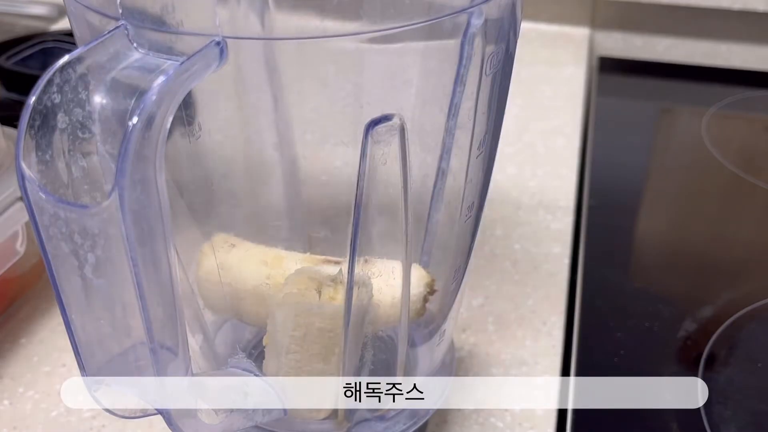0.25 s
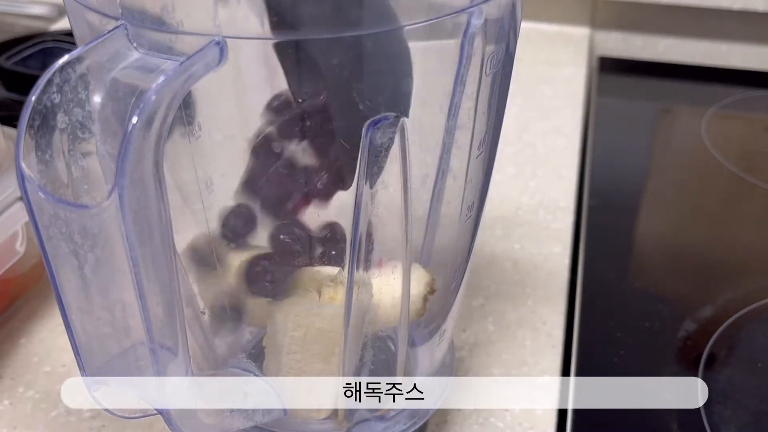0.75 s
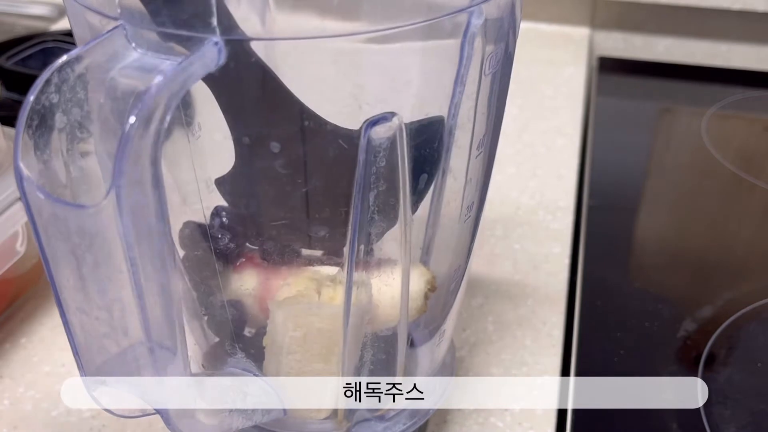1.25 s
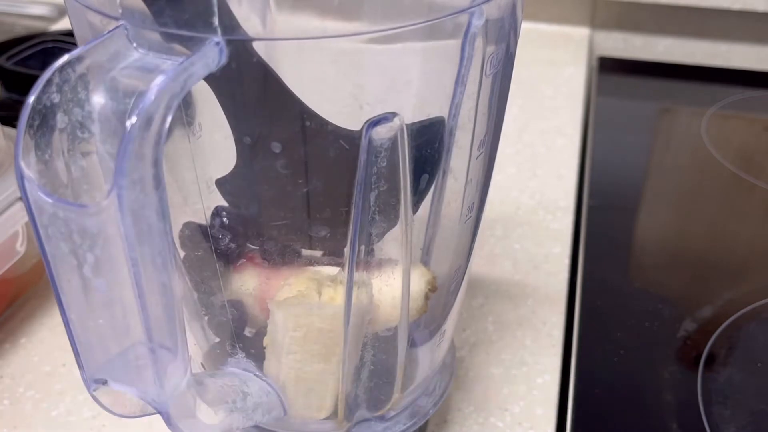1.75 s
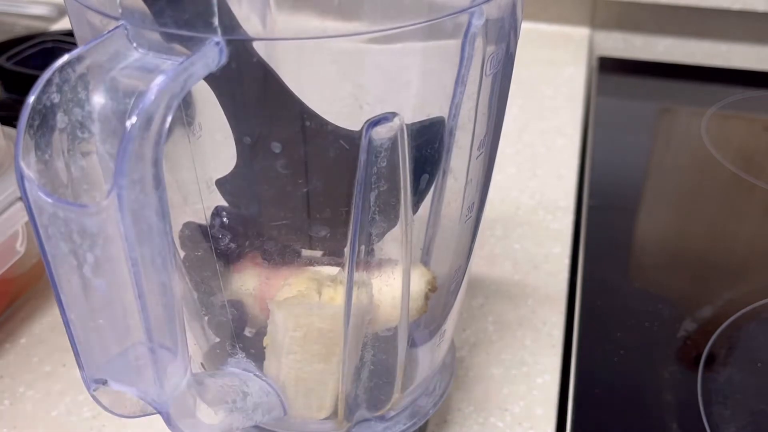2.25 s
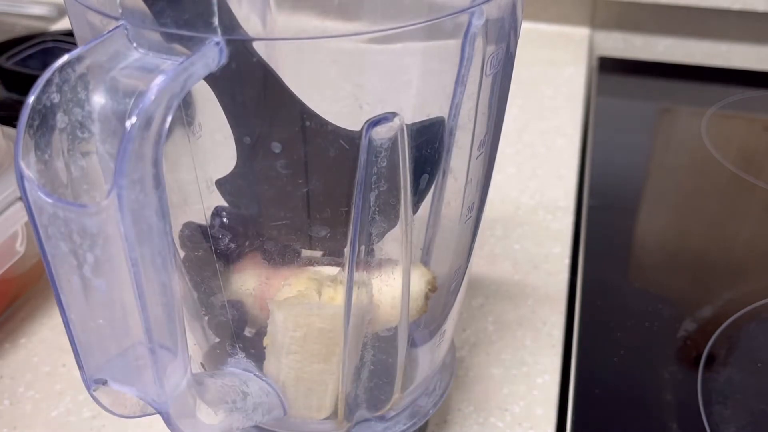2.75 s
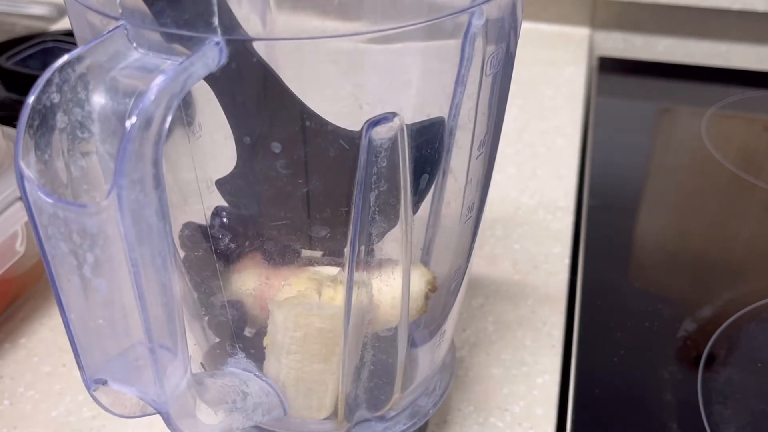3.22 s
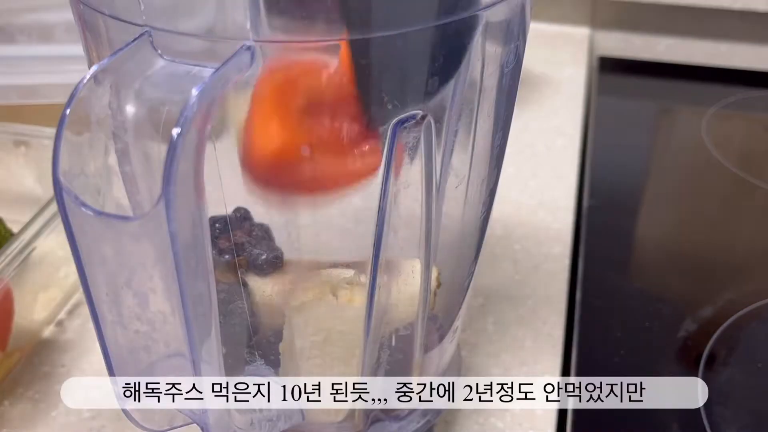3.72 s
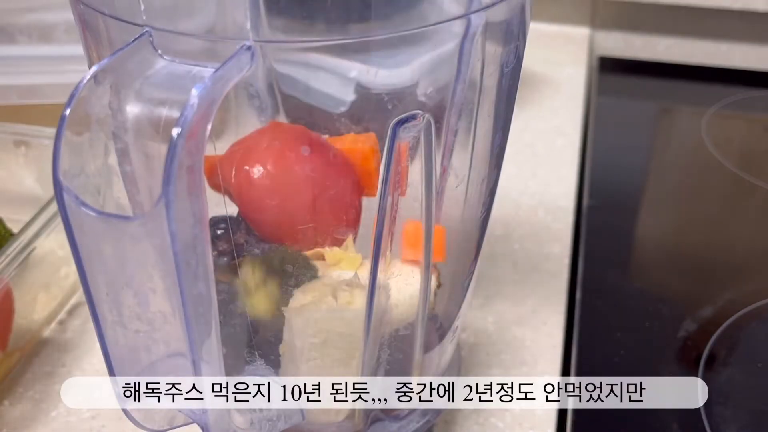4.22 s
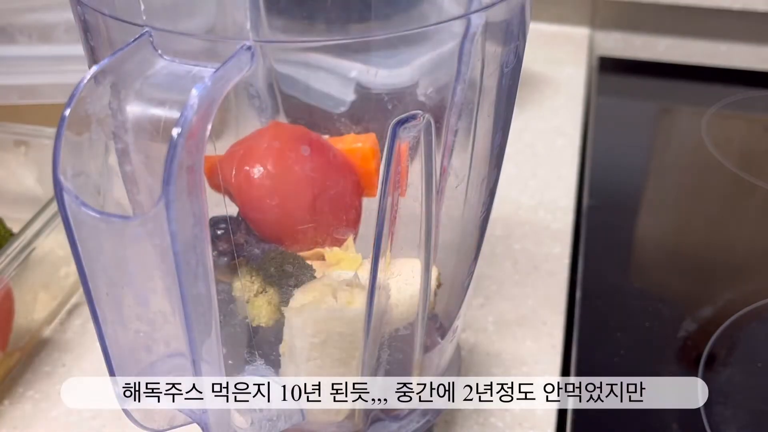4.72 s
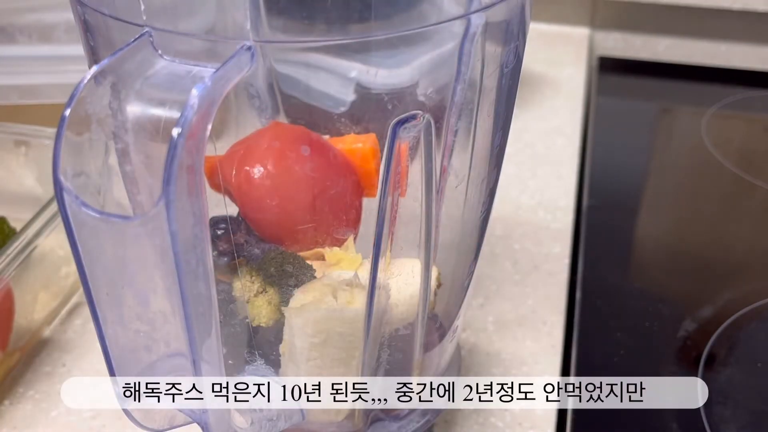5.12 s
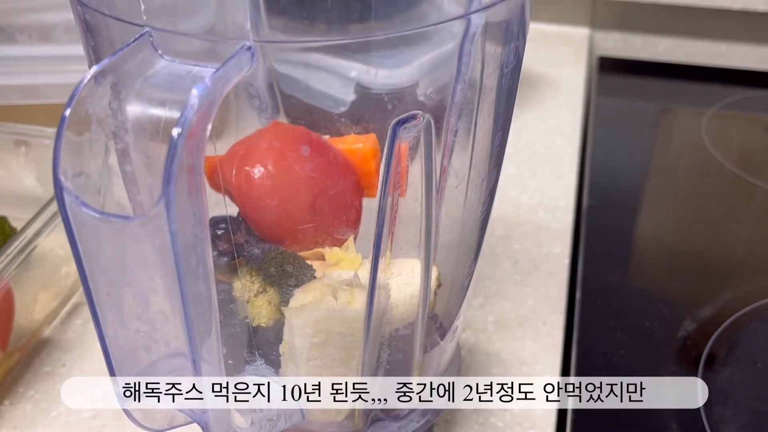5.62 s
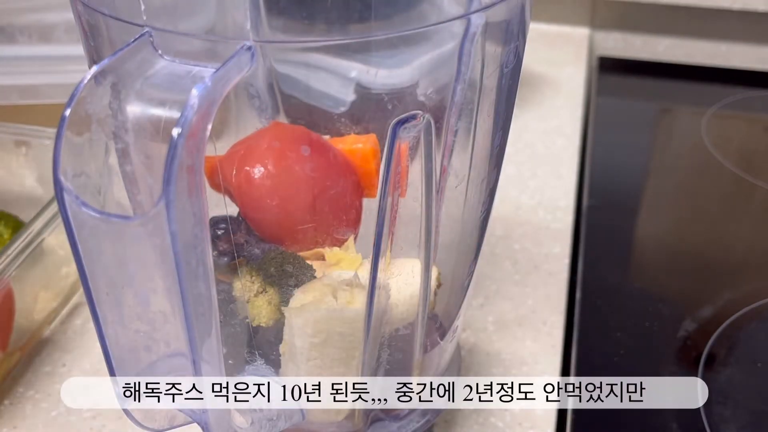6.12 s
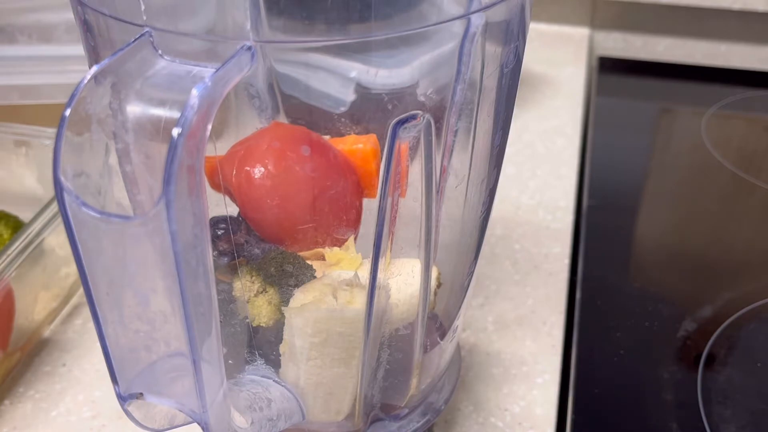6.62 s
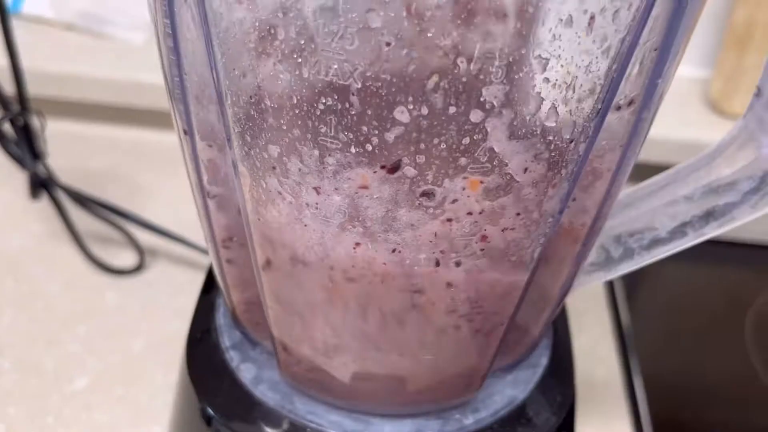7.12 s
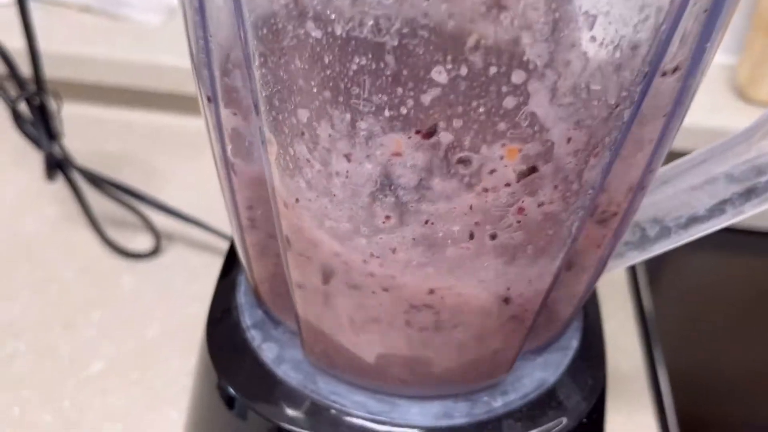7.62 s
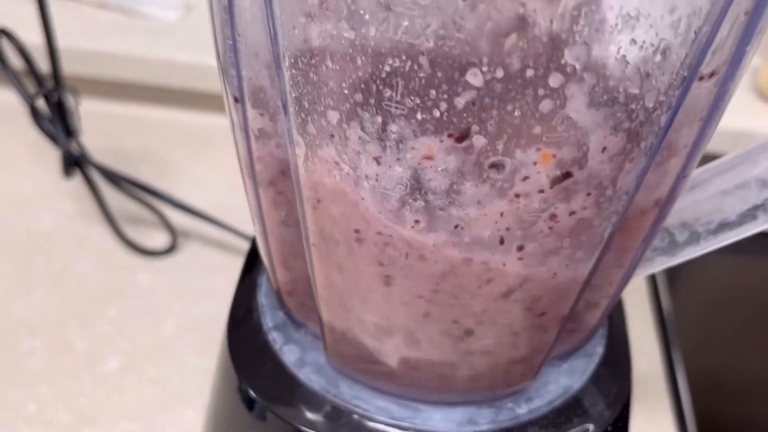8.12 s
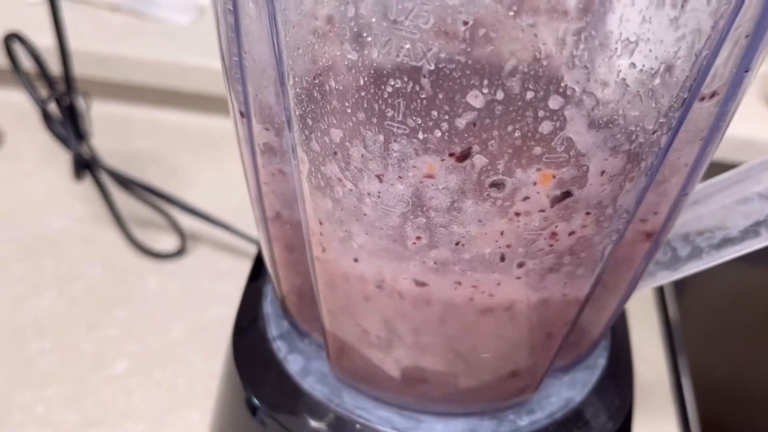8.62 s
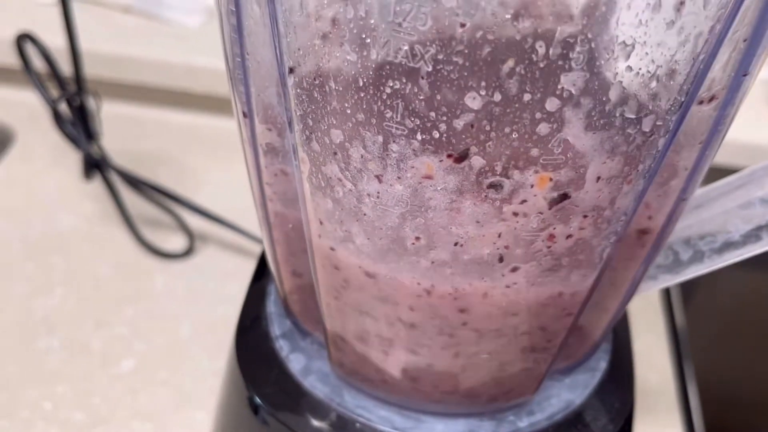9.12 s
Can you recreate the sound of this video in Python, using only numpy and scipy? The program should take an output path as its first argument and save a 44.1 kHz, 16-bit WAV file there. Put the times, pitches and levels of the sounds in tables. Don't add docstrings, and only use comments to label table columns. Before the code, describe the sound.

Phone-close stereo kitchen scene: quiet room air and hum, a burst of hard berry rattles ringing the jug wall, hollow container knocks, one loud lid snap and smaller thuds. A calmer stretch follows with faint bag crinkle and a few distant taps. Then, without any start-up, a loud blender roars steadily, with wet slosh, shaft whine, bubbling gulps and a brief squeak.

```python
import sys
import numpy as np
from scipy import signal
from scipy.fft import rfft, irfft, next_fast_len
from scipy.io import wavfile
from scipy.ndimage import uniform_filter1d, map_coordinates

SR = 44100
rng = np.random.default_rng(int(sys.argv[2]) if len(sys.argv) > 2 else 0)


def volts_from_decibels(level):
    exponent = np.asarray(level, float) / 20
    return 10 ** exponent


def waveform_to_disk(signal):
    frames = np.transpose(np.atleast_2d(signal))
    scaled = np.clip(frames, -1, 1) * 32767
    samples = np.round(scaled).astype(np.int16)
    wavfile.write(sys.argv[1], SR, samples)


N = 412776
T = np.arange(N) / SR
STEP = 64

CUTS = (3.385, 7.1195)

# start in seconds, #
# peak in dB, ring in Hz, thud in dB.
BERRIES = [(0.5432, -49, 6400, -19), (0.613, -42.5, 3820, -4.5), (0.6666, -34.5, 1880, -9),
           (0.7194, -35.5, 2000, -11), (0.7402, -39, 2110, -4.5), (0.7745, -47, 1960, -8),
           (0.7866, -43, 1930, -12), (0.7965, -44, 1960, -12), (0.8047, -45, 1930, 7),
           (0.8125, -45, 1950, -8), (0.8266, -44, 1800, -6), (0.9343, -43.5, 3160, 2),
           (1.0628, -24.5, 2010, -12), (1.0735, -33, 2100, -12), (1.0877, -22, 3600, -5),
           (1.0925, -26, 2300, -12), (1.1165, -10, 2600, -16), (1.1192, -11, 2110, -20),
           (1.1245, -17, 2200, -14), (1.1315, -20, 3000, -14), (1.1512, -17, 2080, -14),
           (1.164, -21, 1950, -14), (1.186, -25, 2000, -8), (1.199, -29, 2100, -8),
           (1.1392, -10, 2070, -13), (1.1476, -14, 2060, -11), (1.1738, -11.5, 2010, -9),
           (1.216, -31, 2000, -2), (1.268, -37.5, 2430, -10.5), (1.3414, -42.5, 1980, -21),
           (1.3972, -39, 2910, -15), (1.4371, -44.5, 2880, -12), (1.727, -44, 2270, -17),
           (3.869, -39, 4900, -14), (3.881, -42, 4300, -12), (4.4276, -43, 1930, -27),
           (6.798, -50, 2880, -7.5)]
BERRY_EDGE_DB, EDGE_DB_PER_OCTAVE, BERRY_T60_S = -20, 6.5, .06

# start in seconds, peak in dB, thud in Hz, thud in dB, edge (brightness) in dB,
# time to die by 60 dB in seconds.
SLAP = (2.6885, -0.7, 353.7, -20, -12.5, 0.03)
# centre in Hz, width in Hz, level in dB.
LID = [(1239, 350, 8.5), (1800, 400, 5), (2650, 700, 14.5), (4327, 700, 8.7), (11000, 2960, 8)]

# start in seconds, peak in dB, thud in Hz, thud in dB, edge in dB.
KNOCKS = [
    (1.9013, -21.5, 668, -6.5, -8),
    (2.1408, -6.5, 345, -.5, -14),
    (2.1495, -13, 345, -9, -14),
]
# centre in Hz, width in Hz, level in
# dB.
TUB = [(1150, 90, 6.5), (1700, 80, 2), (2080, 70, 10), (2700, 90, -5), (3332, 150, 11.5), (4700, 84, -4)]
KNOCK_T60_S, T60_S_PER_DB = .12, .0022

# start in seconds, peak in dB, thud in Hz, thud in dB,
# edge in dB.
BUMPS = [(2.0615, -20, 600, -8, -13), (2.0668, -17, 500, -10, -15), (2.0735, -21, 500, -12, -14),
         (2.0805, -17, 420, -6, -9), (2.0885, -18, 400, -6, -18), (2.0955, -26, 350, 9, -26),
         (2.122, -30, 300, -6, -8), (2.1315, -16, 450, -16, -9), (2.136, -17, 450, -16, -10),
         (2.254, -31, 900, -4.5, -18.5), (2.2957, -37.5, 444, 4, -21), (2.4124, -35.5, 520, 1.5, -25.5),
         (2.4414, -40.5, 390, 1, -34), (2.4677, -34.5, 213, 2, -34.5), (2.5429, -25.5, 345, 2.5, -30),
         (2.5595, -33, 300, -4, -12), (2.5674, -26.5, 376.6, 1.5, -21), (2.6045, -36.5, 200, 9, -28.5),
         (2.6478, -33, 284, 2, -24), (3.0969, -25, 330, -2, -20), (3.108, -40, 196.5, 16, -25),
         (3.2066, -27, 209, 0, -21), (3.221, -32, 201.4, 4, -23.5), (3.2658, -44, 304, 11.5, -25),
         (3.2919, -50, 518, 12, -20), (3.312, -50, 420, 13, -25), (3.334, -51, 500, 13, -25),
         (3.356, -52, 430, 13, -25), (3.377, -47, 207, 12, -24.5)]
# centre in Hz, width in Hz, level in dB.
WORKTOP = [(900, 400, 11), (1650, 250, 0), (2250, 350, 7), (3300, 700, 5), (4700, 300, 0)]
BUMP_T60_S = .13

# start in seconds, peak in dB, thud in Hz, thud in dB.
TAPS = [
    (4.7511, -39.5, 348, 5.5),
    (5.1267, -31, 358, 1.5),
    (5.3004, -57, 501, 14.5),
    (5.4615, -34, 351, 1),
    (5.4999, -34, 353, 0),
    (6.8643, -48, 386, 7.5),
    (7.014, -43.5, 366, 8.5),
]
# centre in Hz, width in Hz, level in dB.
TAPPED = [(810, 1000, 16), (2140, 150, 1.6), (4000, 500, 5)]
TAP_EDGE_DB, TAP_T60_S = -26, .052

# frequency in Hz, level in dB.
CRACK = [(100, -11), (600, -39), (1300, -9), (2500, -11.5), (3600, -18), (5000, -5), (8000, -7),
         (12000, -16.5), (15800, -48.5)]

# start in seconds, hold in seconds, crinkle in dB, body over it in dB.
RUSTLE = [(.1, .09, -70, -12), (.7, .14, -66, 10), (.925, .015, -67, -8), (1.715, .03, -61, 8),
          (1.79, .05, -70, 7), (3.65, .04, -58, 14), (3.7, .08, -62, 13), (3.8, .03, -72, 6),
          (3.92, .08, -66, -7), (4.23, .04, -69, -5), (4.45, .07, -72, -5), (5.04, .12, -67, -6),
          (5.37, .07, -70, -9), (5.7, .1, -74, -8), (6.19, .03, -70, -8), (6.27, .05, -70, -10),
          (6.38, .03, -79, -12), (6.51, .05, -72, -11)]
GRIP_S, LET_GO_DB_PER_S = .025, 260
# frequency in Hz, level in dB.
CRINKLE = [(1500, -29), (3500, 1), (6000, -1), (11000, -5.5), (15800, -20)]
BODY = [(200, -8), (450, -2), (1500, -3.5), (2700, -2), (3400, -14), (5000, -55)]

# time in seconds, churn in dB.
LOAD = [
    (7.13, -25),
    (7.98, -24),
    (8.02, -20),
    (8.07, -26),
    (8.12, -24),
    (8.71, -26),
    (8.72, -25),
    (9.23, -24),
    (9.36, -26),
]
# frequency in Hz, level in dB per Hz.
CHURN = [(30, -19), (60, -34.5), (150, -10), (300, -16), (500, -3.5), (900, -1.5), (1600, -4.8), (2800, -6),
         (4000, -8.5), (5500, -10.5), (7000, -5), (9000, -15), (12000, -17.5), (15500, -30.5)]
# centre in Hz, width in Hz, boost in dB.
JUG = [(215.4, 48, 12.5), (362, 67, 8), (465.4, 27, 12), (1260, 55, 10.5), (1483, 90, 1.5), (1738, 23, 5),
       (2140, 17, 2.5), (2860, 910, 6.5), (4497, 220, 8.5), (5250, 120, 1), (5630, 370, 7)]
SPRAY_DB, SPRAY_FOLLOWS, FIZZ_DB, FIZZ_FOLLOWS = -4, .12, -12.5, .3
SHAFT_HZ = 119.4
# multiple of the #
# shaft speed, level in dB.
ORDER = [(2, -43.5), (3.1, -53), (3.9, -45), (5, -45.5), (6, -37), (7, -42), (8, -48), (9, -56),
         (10.55, -48), (12.15, -41.5)]
# middle in seconds, half length in seconds, pitch in Hz, level in dB.
SQUEAK = (8.7, .042, 3030, -29)
# start in seconds, pitch in Hz, level in dB.
GULPS = [(7.2, 870, -30), (7.43, 460, -28), (7.53, 1270, -27), (7.86, 720, -28), (7.96, 980, -29),
         (8.0, 460, -26), (8.01, 1260, -28), (8.13, 1260, -28), (8.31, 850, -29), (8.39, 800, -26),
         (8.57, 230, -29), (8.72, 850, -30), (8.78, 230, -26), (8.86, 1290, -29), (8.88, 560, -26),
         (9.1, 400, -29), (9.14, 450, -28), (9.19, 380, -27)]
BIG_GULP_S, BIG_GULP_DB = .022, -5

# frequency in Hz, level in dB per Hz.
AIR = [(25, -16), (55, 1.5), (120, -10.5), (230, -2), (400, -19), (1000, -27.5), (1700, -37), (2200, -43),
       (3500, -54.5), (5000, -55), (8000, -46), (12000, -49.5), (15800, -44)]
# centre in Hz, width in Hz, level in dB.
FRIDGE = [(88.8, 14, -55.5), (238.7, 14, -61), (314.4, 8.7, -66), (2880, 70, -82), (6600, 160, -77.5)]
# pitch in Hz, level in dB.
HUM = [(89.8, -50), (179.6, -52.5)]
# time in seconds, shake in dB, boom in dB.
JOLTS = [(.01, -39, -47), (.48, -41, -65), (.58, -41, -55), (.7, -50, -45), (.85, -41, -44),
         (1.17, -35.5, -32), (1.54, -42, -61), (1.78, -44, -64), (2.15, -43, -36), (2.21, -31, -46),
         (2.56, -42, -40), (2.68, -35.5, -42), (2.87, -42, -62), (3.15, -36, -35), (3.27, -39.5, -43),
         (3.78, -41, -48), (3.92, -41, -51), (4.28, -47, -55), (5.1, -44, -48), (5.49, -48, -48),
         (6.35, -49, -57), (6.5, -43, -63)]
JOLT_RISE_DB_PER_S, JOLT_FALL_DB_PER_S, BOOM_FASTER = 90, 70, 2.2
REST_SHAKE_DB, REST_BOOM_DB = -50.5, -63

# frequency in Hz, time to die by 60 dB in seconds.
WALLS = [(150, .5), (1200, 0.64), (5000, 0.42), (12000, 0.41)]
# frequency in Hz, likeness from 0 to 1.
ALIKE = [(80, 1), (300, .9), (600, 0.6), (1200, 0.62), (1550, .25), (2100, .93), (2700, .99)]
# frequency in Hz, left minus right in dB.
LEAN = [(100, -0.6), (300, 1), (750, 1), (1150, 1.5), (1700, -7), (2500, 1.4), (3200, 0)]
# frequency in Hz, lead in radians.
LEAD = [(4200, 0), (5200, .7), (7700, 2.5), (8400, np.pi), (9100, 3.8), (11000, 5.6), (12000, 2 * np.pi),
        (13000, 7), (14700, 8.75), (15800, 3 * np.pi)]
AHEAD_DB = 19


def berries(bands):
    out = np.zeros((2, N))
    t = np.arange(SR // 10) / SR
    for s, db, ring_hz, thud_db in BERRIES:
        edge_db = BERRY_EDGE_DB + EDGE_DB_PER_OCTAVE * np.log2(ring_hz / 2000)
        wall = [(ring_hz, 140, 10), (1100, 200, 4), (3500, 600, 6)]
        add(out, s, hit(bands, s, db, 437.4, thud_db, edge_db, BERRY_T60_S, wall, thud_t60=0.11,
                        hold=0.001, rise=.0003, tick_db=-9, wet_db=-17.5))
        fade = volts_from_decibels(db - 10.5 - 60 * t / .048) * (1 - np.exp(-t / .0015))
        add(out, s, fade * np.sin(2 * np.pi * ring_hz * t) * [[1], [.3]])
    return out


def knocks(bands):
    out = np.zeros((2, N))
    add(out, SLAP[0], hit(bands, *SLAP, LID, thud_t60=.08, hold=0.007, rise=.001, tick_db=-5, wet_db=-7))
    for row in KNOCKS:
        t60 = max(KNOCK_T60_S + T60_S_PER_DB * row[1], .015)
        add(out, row[0], hit(bands, *row, t60, TUB, thud_t60=.085,
                             hold=0.0016, rise=0.0022, tick_db=-11.5, wet_db=-11.5))
    for row in BUMPS:
        t60 = max(BUMP_T60_S + T60_S_PER_DB * row[1], .015)
        add(out, row[0], hit(bands, *row, t60, WORKTOP, thud_t60=.13,
                             hold=0.004, rise=0.0012, tick_db=-10, wet_db=-9.5))
    for row in TAPS:
        add(out, row[0], hit(bands, *row, TAP_EDGE_DB, TAP_T60_S, TAPPED, thud_t60=0.071,
                             hold=0.003, rise=0.00077, tick_db=-24, wet_db=-6))
    blows = np.zeros((2, N))
    for s, db, *_ in [SLAP, *KNOCKS, *BUMPS, *TAPS]:
        add(blows, s, volts_from_decibels(db + AHEAD_DB) * np.array([[1], [.5]]))
    ahead = filtered(blows, lambda f: np.conj(peak(f, 1700, 36) + .25 * peak(f, 5100, 40)))
    return filtered(out, lambda f: 1 + .5 * np.conj(peak(f, 1700, 60))) + ahead


def hit(bands, s, db, thud_hz, thud_db, edge_db, t60, modes, thud_t60, hold, rise, tick_db, wet_db):
    t = T[:SR // 7]
    rattle = volts_from_decibels(2.5 * np.repeat(rng.standard_normal(len(t) // 90 + 1), 90)[:len(t)])
    decay = volts_from_decibels(-60 * t / t60) + 1.5 * np.exp(-(t / hold) ** 3)
    burst = rattle * rng.standard_normal((2, len(t))) * decay * (1 - np.exp(-t / rise))
    modes = [(hz, width, level + rng.normal(0, 2.5)) for hz, width, level in modes]

    def tone(f, q):
        dull = volts_from_decibels((edge_db + 6) * np.clip(1.4 * np.log2(f / 3300 + .01), 0, 1.1))
        ring = sum(volts_from_decibels(level) / q * peak(f, hz, q * width) for hz, width, level in modes)
        return volts_from_decibels(along(CRACK, f)) * dull * (1 + ring)

    crack = filtered(burst, lambda f: tone(f, 0.82))
    crack = crack / np.abs(crack[0]).max()
    tick_noise = np.diff(rng.standard_normal((2, len(t) + 2)), 2) / 2
    tick = volts_from_decibels(tick_db + .5 * edge_db - 60 * t / .018) * tick_noise
    fade = volts_from_decibels(-60 * t / thud_t60) * (1 - np.exp(-t / 0.0029))
    rough = filtered(rng.standard_normal((2, len(t))) * fade, lambda f: peak(f, .95 * thud_hz, 400) ** 2)
    rough = rough / np.abs(rough[0]).max()
    thud = volts_from_decibels(thud_db) * (fade * np.sin(2 * np.pi * thud_hz * t) + .9 * rough)
    tail = room_tail(bands, (db + wet_db + 80) / 100)
    diffuse = filtered(tail, lambda f: tone(f, 2))
    wet_crack = diffuse * np.linalg.norm(crack[0]) / np.linalg.norm(diffuse[0])
    wet = wet_crack + signal.fftconvolve(thud[:1], tail, axes=1)[:, :tail.shape[1]]
    late = np.pad(wet, ((0, 0), (200, SR)))[:, :SR + len(t)]
    both = np.pad(crack + tick + thud, ((0, 0), (0, SR))) + volts_from_decibels(wet_db) * late
    left = round((CUTS[s > CUTS[0]] - s) * SR)
    return volts_from_decibels(db) * both[:, :left]


def rustle():
    grains = volts_from_decibels(2.2 * wobble(60) + 3 * wobble(400))
    crinkle, body = hiss(lambda f: volts_from_decibels(along(CRINKLE, f)), lambda f: volts_from_decibels(along(BODY, f)), patchy_db=2)
    moves = []
    for s, hold, db, body_db in RUSTLE:
        swell = volts_from_decibels(db + swell_db(s, hold, 20 / GRIP_S, LET_GO_DB_PER_S))
        moves.append(swell * volts_from_decibels([[0], [body_db - 4.0]]))
    thin, thick = smooth(np.sum(moves, axis=0))
    return unit(grains) * (thin * crinkle + thick * body)


def blender():
    first = round(CUTS[1] * SR)
    n, t = N - first, T[first:]
    churn_db = curves(LOAD)[0][first:]
    swing_db = churn_db - churn_db.mean()
    spray_db = SPRAY_DB + (SPRAY_FOLLOWS - 1) * swing_db + .6 * wobble(9, n)
    settling_db = 3.5 * np.exp(-(t - CUTS[1]) / .35)
    fizz_db = FIZZ_DB + (FIZZ_FOLLOWS - 1) * swing_db + 1.2 * wobble(20, n) + settling_db

    def jug(f):
        boost = sum(db * np.abs(peak(f, hz, width)) ** 2 for hz, width, db in JUG)
        return volts_from_decibels(along(CHURN, f) + boost)

    def below(f, hz):
        return 1 / (1 + (f / hz) ** 8)

    churn, spray, fizz = hiss(lambda f: jug(f) * below(f, 2460),
                              lambda f: 1j * jug(f) * (1 - below(f, 2230)) * below(f, 6800),
                              lambda f: jug(f) * (1 - below(f, 7500)), patchy_db=1.2, size=n)
    shaft_hz = SHAFT_HZ * (1 + .011 * wobble(5, n) + .003 * wobble(40, n))
    turn = 2 * np.pi * np.cumsum(shaft_hz) / SR
    whine = sum(volts_from_decibels(db + .8 + 3.2 * wobble(12, n)) * np.sin(k * turn + [[0], [1.17 * k]]) for k, db in ORDER)
    s, half, hz, db = SQUEAK
    rub = volts_from_decibels(db + 1.5 * wobble(71, n)) * np.exp(-((t - s) / half) ** 4)
    whine = whine + rub * np.sin(2 * np.pi * hz * t + .8 * wobble(70, n))
    slosh = volts_from_decibels(1.06 * wobble(45, n))
    pulp = volts_from_decibels(churn_db) * slosh * (churn + volts_from_decibels(spray_db) * spray + volts_from_decibels(fizz_db) * fizz)
    tones = volts_from_decibels(churn_db + 28.0) * (whine + gulps(count=70, db=-33)[:, first:])
    return np.pad(pulp + tones, ((0, 0), (first, 0)))


def gulps(count, db):
    draw = rng.random((count, 5))
    t = np.arange(SR // 12) / SR
    start = CUTS[1] + (N / SR - CUTS[1]) * draw[:, :1]
    hz = 280 * 3.6 ** draw[:, 1:2]
    life = 0.011 + 0.024 * draw[:, 2:3]
    level_db = db - 15.4 * draw[:, 3:4]
    big_s, big_hz, big_db = np.transpose(GULPS)[:, :, None]
    big = slice(len(GULPS))
    start[big], hz[big] = big_s, big_hz
    level_db[big], life[big] = big_db + BIG_GULP_DB, BIG_GULP_S
    glide = 1 + .04 * (draw[:, 4:] - .5) * t / life
    swell = (t / life) * np.exp(1 - t / life) ** 2
    tone = np.sin(2 * np.pi * hz * t * glide) * swell * volts_from_decibels(level_db)
    at = (start * SR).astype(int) + np.arange(len(t))
    sides = (1, 2 * draw[:, 4:] - 1)
    return np.array([np.bincount(at.ravel(), (tone * lean).ravel(), N + SR)[:N] for lean in sides])


def kitchen():
    pushes = []
    for s, shake_db, boom_db in JOLTS:
        swell = swell_db(s, 0, JOLT_RISE_DB_PER_S, JOLT_FALL_DB_PER_S)
        pushes.append(swell * [[1], [BOOM_FASTER]] + [[shake_db], [boom_db]])
    strongest_db = np.maximum(np.max(pushes, axis=0), [[REST_SHAKE_DB], [REST_BOOM_DB]])
    shake_gain, boom_gain = smooth(volts_from_decibels(strongest_db))

    def lines(f):
        return sum(volts_from_decibels(db) * peak(f, hz, width) ** 2 / np.sqrt(width) for hz, width, db in FRIDGE)

    air, fuzz, shake, boom = hiss(lambda f: volts_from_decibels(along(AIR, f)) * np.abs(f / (f + 150)) ** 3,
                                  lambda f: 1j * np.abs(lines(f)),
                                  lambda f: np.abs(peak(f, 58, 35)) ** 2,
                                  lambda f: 1j * np.abs(peak(f, 118, 50)) ** 3, patchy_db=2.3)
    hum = sum(volts_from_decibels(db + 3 + 1.4 * wobble(7)) * np.sin(2 * np.pi * hz * T + .5 * wobble(6)) for hz, db in HUM)
    fuzz_gain = np.linalg.norm(volts_from_decibels(np.transpose(FRIDGE)[2]))
    return volts_from_decibels(-54.5) * air + hum + fuzz_gain * fuzz + shake_gain * shake + boom_gain * boom


def room_bands():
    def share(f):
        return [[along([(hz, k == j) for j, (hz, _) in enumerate(WALLS)], f)] for k in range(len(WALLS))]

    return filtered(rng.standard_normal((2, 3 * SR)), lambda f: np.array(share(f)))


def room_tail(bands, heard_s):
    at = rng.integers(2 * SR)
    t = T[:int(np.clip(heard_s, .15, .7) * SR)]
    tail = sum(band[:, at:at + len(t)] * volts_from_decibels(-60 * t / t60) for band, (_, t60) in zip(bands, WALLS))
    return tail / np.linalg.norm(tail[0])


def ports(pair):
    def turn(f):
        return np.arccos(np.clip(along(ALIKE, f), -1, 1)) / 2

    def side(f):
        return volts_from_decibels(along(LEAN, f) / 2) * np.exp(-.5j * np.interp(f, *np.transpose(LEAD)))

    def microphones(f):
        low_cut = 1 + (31 / (f + 1)) ** 4
        return [side(f), 1 / side(f)] / low_cut

    near, far = filtered(pair, lambda f: [np.cos(turn(f)), np.sin(turn(f))])
    return filtered(np.array([near + far, near - far]), microphones)


def unit(x):
    return x / np.sqrt(np.mean(x ** 2) + 1e-20)


def along(points, hz):
    f, v = np.transpose(points)
    return np.interp(np.log(hz + 1), np.log(f + 1), v)


def curves(rows):
    s, *cols = np.transpose(rows)
    return [np.interp(T, s, c) for c in cols]


def wobble(rate, size=N):
    coarse = np.arange(0, size + 32, 32)
    knots = rng.standard_normal(int(N * 400 / SR) + 9)
    return np.interp(np.arange(size), coarse, map_coordinates(knots, [coarse * min(rate, 400) / SR]))


def filtered(x, response):
    m = next_fast_len(x.shape[-1] + 8192)
    return irfft(rfft(x, m) * response(np.fft.rfftfreq(m, 1 / SR)), m)[..., :x.shape[-1]]


def peak(f, hz, width):
    return 1j * f * width / (hz * hz - f * f + 1j * f * width)


def hiss(*responses, patchy_db, size=N):
    z = signal.stft(rng.standard_normal((2, size)), nperseg=512)[2]
    field = uniform_filter1d(rng.standard_normal(z.shape[1:]), size=6, axis=0)
    field = uniform_filter1d(field, size=10, axis=1)
    noise = signal.istft(z * volts_from_decibels(patchy_db * unit(field)), nperseg=512)[1][:, :size]
    return [unit(x) for x in filtered(noise, lambda f: np.array([[r(f)] for r in responses]))]


def swell_db(start, hold, rise_db_per_s, fall_db_per_s):
    t = T[::STEP]
    before, after = np.clip(start - t, 0, None), np.clip(t - start - hold, 0, None)
    return -rise_db_per_s * before - fall_db_per_s * after


def smooth(steps):
    return [np.interp(T, T[::STEP], row) for row in steps]


def add(out, s, sound):
    at = round(s * SR)
    out[:, at:at + sound.shape[1]] += sound[:, :N - at]


def scene():
    air, bands = kitchen(), room_bands()
    filling = berries(bands) + knocks(bands) + rustle() + air
    blending = blender() + volts_from_decibels(-2.5) * air
    return ports(np.where(T < CUTS[1], filling, blending))


def joint_stereo(x, under_db, jump_db):
    hz, _, z = signal.stft([x[0] + x[1], x[0] - x[1]], SR, nperseg=2048)
    band = np.arange(len(hz)) // 16
    power = np.add.reduceat(np.abs(z) ** 2, np.arange(0, len(hz), 16), axis=1) + 1e-20
    margin = volts_from_decibels(under_db + 3.5 * rng.standard_normal(power.shape[1:]))
    treble = power[:, 10:].sum(axis=(0, 1))
    steady = treble < volts_from_decibels(jump_db) * np.roll(treble, 1)
    weaker = (power < margin ** 2 * power[::-1])[:, band]
    dropped = weaker & steady & (hz > 2300)[:, None]
    kept = z * ~dropped * (hz < 15900)[:, None]
    mid, side = signal.istft(kept, SR, nperseg=2048)[1][:, :N]
    return np.array([mid + side, mid - side]) / 2


def low_pass(x):
    return signal.sosfilt(signal.butter(12, 16650, fs=SR, output="sos"), x)


def record(dry):
    held = dry / (1 + np.abs(dry / .85) ** 4) ** .25
    mix = joint_stereo(held, under_db=-7.5, jump_db=12)
    return low_pass(mix)


dry = scene()
out = record(dry)
waveform_to_disk(out)
```